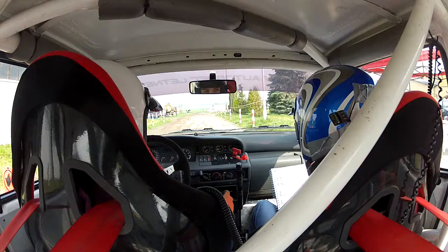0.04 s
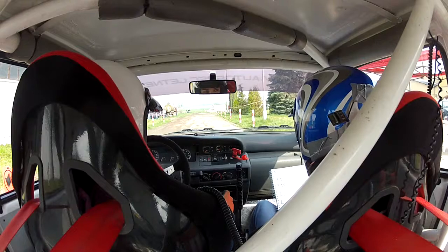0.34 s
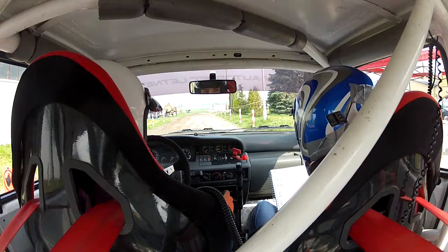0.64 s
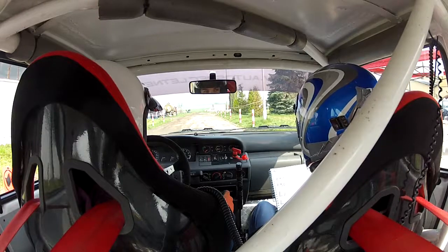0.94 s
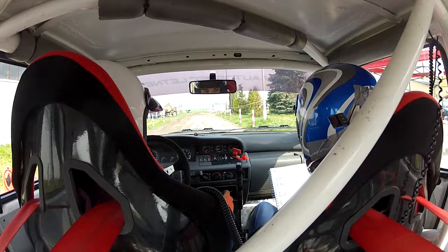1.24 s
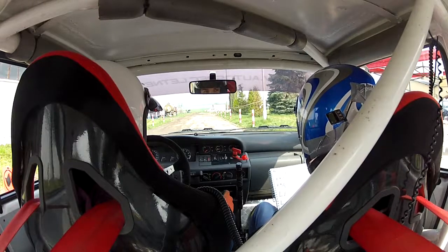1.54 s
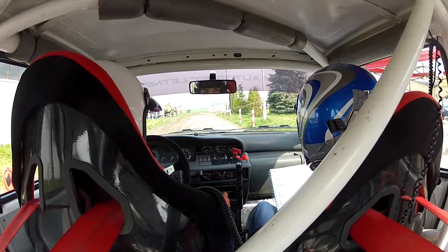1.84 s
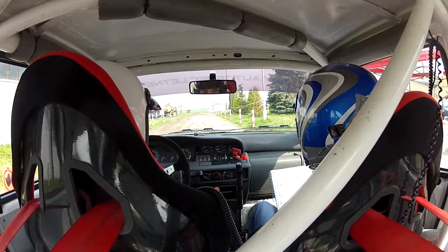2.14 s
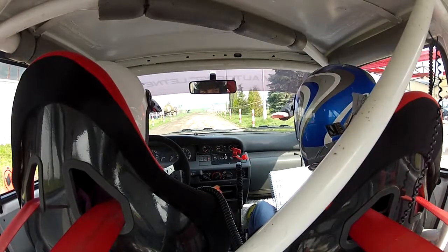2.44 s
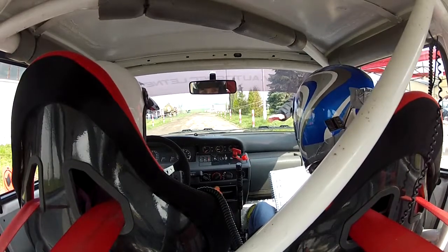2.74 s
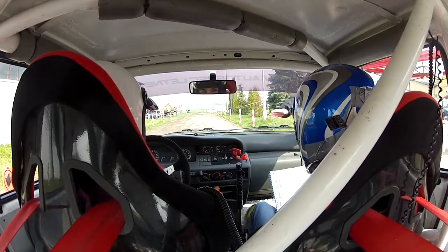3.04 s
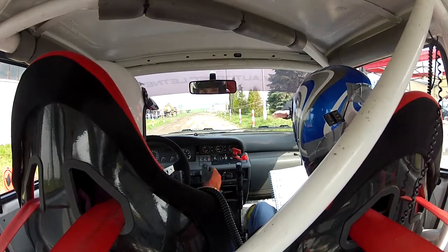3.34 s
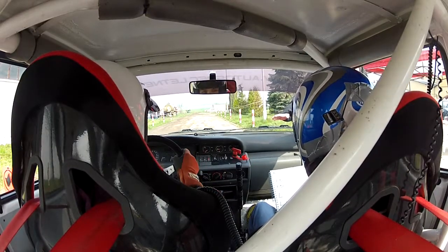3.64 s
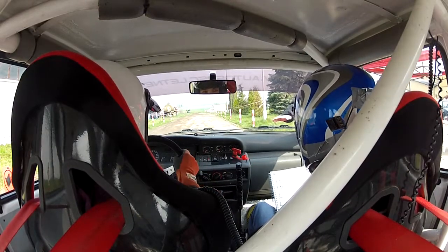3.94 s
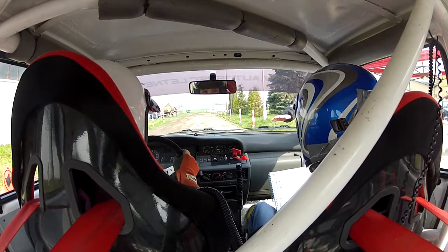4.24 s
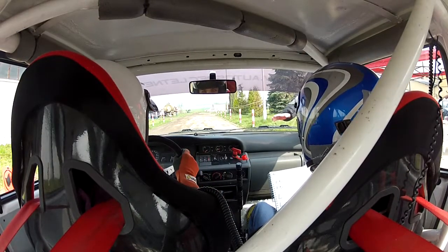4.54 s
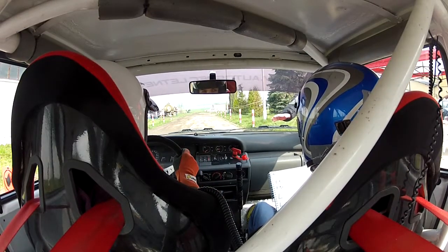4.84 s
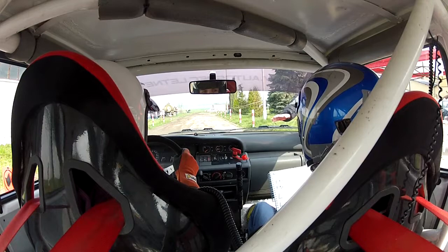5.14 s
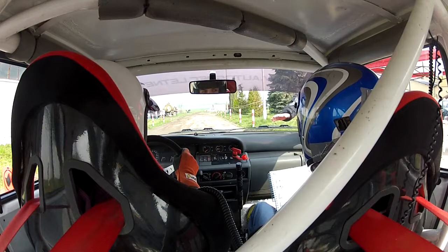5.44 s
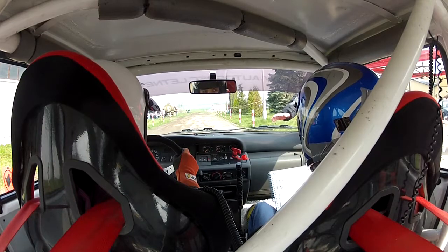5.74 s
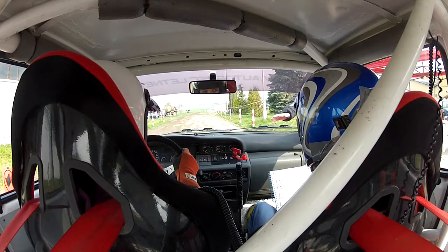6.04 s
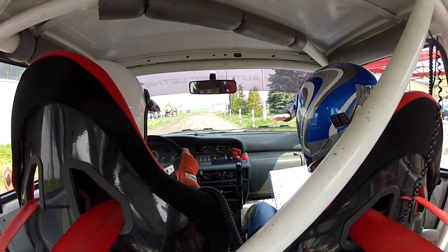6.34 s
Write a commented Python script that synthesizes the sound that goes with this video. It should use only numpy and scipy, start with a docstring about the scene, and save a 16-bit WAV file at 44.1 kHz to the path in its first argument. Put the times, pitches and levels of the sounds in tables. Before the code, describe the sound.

Inside the bare cabin of a standing rally car, two four-cylinder engines boom and beat against each other over valve clatter. One idles steadily. The closer one is blipped, runs down for a couple of seconds, then is blipped five times in quick succession. Loose fittings tick, the bodywork knocks softly, a panel chatters briefly, and one dry click comes near the end. The microphone stays in the cabin.

```python
"""Two four-cylinder engines, heard from one microphone in the bare cabin of a standing rally car.
One idles steadily; the other, close by, is blipped, runs down, then is blipped again and again.
Their exhaust pulses boom in the cabin and beat against each other over the clatter of valve gear.
Loose fittings tick on the crests of the boom, the bodywork knocks softly, a panel chatters
in short spells, and there is one dry click."""
import sys
import numpy as np
from scipy import signal
from scipy.fft import rfft, irfft
from scipy.io import wavfile

SR = 44100
rng = np.random.default_rng(int(sys.argv[2]) if len(sys.argv) > 2 else 0)


def inscribe(sig):
    """Save sig as 16-bit PCM at rate SR to the path in sys.argv[1].

    A 1-D sig is mono; a 2-D sig holds one channel per row.
    Samples are clipped to [-1, 1] before scaling.
    """
    pcm = np.round(np.clip(np.atleast_2d(sig).T, -1, 1) * 32767)
    wavfile.write(sys.argv[1], SR, pcm.astype(np.int16))


N = 291060
TIME = np.arange(N) / SR
IDLE_HZ, REST_HZ = 43.042, 30.026  # firing rates: the steady engine, the blipped one at rest

# metal rung by valve gear and knocks: f/Hz, width/Hz, level/dB, polarity
METAL_MODES = [(534, 7.4, 8, 1), (885, 43, 6.5, 1), (960.5, 18, 9, 1), (1103, 23, 4.5, 1),
               (1556, 17, 0.5, 1), (1772, 29, 3.5, 1)]
# spectrum of valve gear and knocks at the microphone: f/Hz, relative level/dB
CLATTER_SPECTRUM = [(150, -4.5), (330, -1), (430, 3.5), (540, -4), (640, -6), (760, -4), (930, -0.5),
                    (1200, 1), (1450, -7), (1850, -9), (2500, -11.5), (3100, -23), (6000, -30),
                    (15000, -31)]


def gain_of(db):
    """Decibels to amplitude."""
    return 10 ** (np.asarray(db) / 20)


def unit_rms(x):
    """Scales to rms 1."""
    return x / np.sqrt(np.mean(x ** 2) + 1e-20)


def wander(hz):
    """Random drift of rms 1, up to about the given rate."""
    f = np.fft.rfftfreq(N, 1 / SR)
    return unit_rms(irfft(rfft(rng.standard_normal(N)) / (1 + (f / hz) ** 4), N))


def colour(x, spectrum, size=4096):
    """Causal filter of unit energy, shaped by rows of f/Hz, level/dB."""
    hz, db = np.transpose(spectrum)
    f = abs(np.fft.fftfreq(size, 1 / SR))
    log_gain = np.log(gain_of(np.interp(np.log(f + 1), np.log(hz), db)))
    taps = np.fft.ifft(np.exp(np.conj(signal.hilbert(log_gain)))).real  # minimum phase
    return signal.oaconvolve(x, taps / np.linalg.norm(taps))[:N]


def resonances(x, modes):
    """Rings damped modes, given as rows of f/Hz, width/Hz, level/dB, polarity."""
    f = np.fft.rfftfreq(2 * N, 1 / SR)
    response = sum(np.sign(sign) * gain_of(db) * 1j * f * width / (hz ** 2 - f ** 2 + 1j * f * width)
                   for hz, width, db, sign in modes)
    return irfft(rfft(x, 2 * N) * response)[:N]


def below(x, hz):
    """Low-pass without delay."""
    return signal.sosfiltfilt(signal.butter(3, hz, fs=SR, output="sos"), x)


def cycle_starts(cycles):
    """Samples at which a count of cycles passes a whole number."""
    return np.flatnonzero(np.diff(np.floor(cycles)) > 0)


def scrapes(at, sizes, decay_s):
    """A short burst of noise at each contact."""
    contacts = np.zeros(N)
    contacts[at] = sizes
    pole = np.exp(-1 / (decay_s * SR))
    envelope = signal.lfilter([np.sqrt(1 - pole * pole)], [1, -pole], contacts)
    return envelope * rng.standard_normal(N)


def idling_engine(cycles, note_db=-19.0, waver=0.55):
    """The steady exhaust: a firm firing note and overtones that waver from cycle to cycle."""
    # exhaust overtones: multiple of the firing rate, level/dB
    orders = [(2, -33), (2.5, -37.5), (3, -38), (4, -47.5), (5, -46.5), (6, -39.5), (7, -57), (8, -66.5)]
    overtones = np.zeros(N)
    for order, db in orders:
        wavering = 1 + waver * (wander(11.5) + 1j * wander(13.6))  # in level and phase
        overtones += gain_of(db) * (wavering * np.exp(2j * np.pi * order * cycles)).real
    return gain_of(note_db) * np.cos(2 * np.pi * cycles) + overtones


def throttle(drop_s=.06, coast_s=.983, lead_s=0.033, pedal_s=0.014):
    """Blips raise the revs; one light touch near 2 s only swells the boom as the engine runs down."""
    # blips and the touch: start t/s, end t/s, firing rate at the end/Hz, share that drops fast, load/dB
    presses = [(1.15, 1.502, 66, 0.086, 4.5), (1.903, 2.05, 49.55, 0.0044, 4.5),
               (4.078, 4.498, 64.2, 0.27, 3), (4.69, 4.929, 62, .22, 4), (5.2, 5.498, 64.5, .1, 4.5),
               (5.829, 6.091, 67.5, .15, 4.5), (6.428, 6.69, 64, .18, 3.5)]
    rate, push_db, coasted_s = np.full(N, REST_HZ), np.zeros(N), np.zeros(N)
    for start, end, end_hz, drop, load_db in presses:
        progress = np.clip((TIME - start) / (end - start), 0, 1)
        blend = np.sin(np.pi / 2 * progress) ** 1.571  # S-curve
        since = np.maximum(TIME - end, 0)
        left = drop * np.exp(-since / drop_s) + (1 - drop) * np.exp(-since / coast_s)
        rate = rate + blend * (REST_HZ + (end_hz - REST_HZ) * left - rate)
        # the throttle moves a little ahead of the speed and takes a moment to open or shut
        opened, shut = (.5 + .5 * np.tanh((TIME + lead_s - s) / pedal_s) for s in (start, end))
        push_db += load_db * (opened - shut)
        coasted_s = coasted_s * (1 - opened) + since
    # with the throttle shut it fires harder at speed, softer the longer it coasts
    shut_db = -5 + 8 * np.log2(rate / REST_HZ) - 3 * coasted_s
    return rate, shut_db + push_db


def blipped_engine(rate, load_db, uneven=0.23, cylinders=(1.12, .92, 1.05, .9)):
    """Close by: one exhaust pulse a firing, no two alike, and a turbulent rush that grows with speed."""
    # boom of exhaust and cabin: f/Hz, width/Hz, level/dB, polarity at the microphone
    cabin_modes = [(43.06, 2.32, -7, 1), (60.7, 7.7, -39, -1), (90.4, 6.4, -30.5, 1), (107.9, 13, -24.5, 1),
                   (122.6, 7.8, -17.5, -1), (167.5, 2.5, -31.5, 1), (202.7, 10.5, -38.5, -1),
                   (221.3, 8.2, -34, 1), (256.3, 7.66, -28, -1), (294, 26, -49.5, 1), (338, 54, -50, -1)]
    at = cycle_starts(np.cumsum(rate) / SR)
    strength = np.resize(cylinders, len(at)) * (1 + uneven * rng.standard_normal(N)[:len(at)])
    pulses = np.zeros(N)
    pulses[at] = strength * SR / (2 * rate[at])
    rush_db = 7.5 + 8 * np.log2(rate / rate.max())
    exhaust = pulses + gain_of(rush_db) * rng.standard_normal(N)
    # load hardens the pulses: the overtones grow more than the firing note
    bass = below(exhaust, hz=69.6)
    exhaust = bass * gain_of(0.22 * load_db) + (exhaust - bass) * gain_of(load_db)
    return resonances(below(exhaust, hz=423), cabin_modes)


def valve_clatter(idle_cycles, blipped_rate, trim_db=2.5, per_octave_db=4.5, throb=0.053, grain=0.26):
    """Valve gear rings the metal: two taps an idle firing in grainy noise, louder as the revs rise."""
    # clatter at resting speed: t/s, relative level/dB
    rest_levels = [(0, -51.5), (2.0, -51.5), (2.4, -53.5), (6.6, -53.5)]
    throbbing = 1 + throb * np.cos(2 * np.pi * idle_cycles)
    drive = rng.standard_normal(N) * throbbing * np.exp(grain * wander(170))
    taps = cycle_starts(2 * idle_cycles)
    drive[taps] += gain_of(20) * rng.random(N)[:len(taps)]
    drive += resonances(drive, METAL_MODES)
    rest_db = np.interp(TIME, *np.transpose(rest_levels))
    revs_db = per_octave_db * np.log2(blipped_rate / REST_HZ)
    return unit_rms(colour(drive, CLATTER_SPECTRUM)) * gain_of(rest_db + revs_db + trim_db)


def loose_fittings(boom, trim_db=1.0, crest_db=-17.5, follow=0.52, scatter_db=1.0, cluster_db=6.0):
    """In spells, fittings touch on the crests of the low boom, in uneven clusters, harder on high ones."""
    # spells of ticking: start t/s, end t/s, relative level/dB
    spells = [(.1, .43, -70.5), (0.446, 0.816, -66.5), (1.29, 1.389, -66), (1.62, 1.881, -72.5),
              (1.89, 2.08, -63.5), (2.18, 2.949, -64.5), (3.4, 3.961, -67.5), (4.22, 4.42, -62),
              (4.43, 5.68, -64), (5.82, 6.6, -67)]
    # spectrum of a tick: f/Hz, relative level/dB
    tick_spectrum = [(800, -22), (2400, -0.5), (3500, 3.5), (4300, -3.5), (5000, -3), (5450, 7.5),
                     (6000, -16.5), (6550, 4.5), (7200, -8.5), (8600, -8), (10000, -10), (15000, -28)]
    low = below(boom, hz=59.8)
    crests = signal.find_peaks(low, height=0, distance=SR // 60)[0]
    loose = sum(gain_of(db) * (start < TIME[crests]) * (TIME[crests] < end) for start, end, db in spells)
    chance_db = scatter_db * rng.standard_normal(N)[:len(crests)]
    chance_db += cluster_db * np.minimum(wander(10)[crests], 1)
    sizes = loose * (low[crests] / gain_of(crest_db)) ** follow * gain_of(trim_db + chance_db)
    ticks = scrapes(crests, sizes * np.sqrt(2 * N / len(crests)), decay_s=0.0027)
    return colour(ticks, tick_spectrum)


def body_knocks(trim_db=-5., decay_s=0.006, ring_db=38.):
    """Dull taps in the bodywork ring the same metal as the valve gear."""
    # soft knocks: t/s, relative level/dB
    knocks = [(1.247, -36.5), (1.443, -42), (1.51, -41.5), (1.814, -45), (2.044, -40), (3.205, -38),
              (3.556, -41), (3.612, -46), (3.764, -39), (3.859, -43)]
    times, db = np.transpose(knocks)
    at, blows = (times * SR).astype(int), np.zeros(N)
    blows[at] = gain_of(db + trim_db)
    taps = scrapes(at, blows[at] * np.sqrt(decay_s * SR / 2), decay_s)
    ring = gain_of(ring_db) * resonances(blows, METAL_MODES)
    return colour(taps + ring, CLATTER_SPECTRUM) / 2


def panel_chatter(rate, decay_s=0.0032, trim_db=1.0, vary=0.23):
    """In spells, a panel knocks once a joint swing of the two engines, each crunch much like the last."""
    # spells of chatter: first knock t/s, end t/s, relative level/dB
    spells = [(2.494, 2.72, -9), (4.282, 4.315, -9.5), (4.326, 4.34, -19.5), (4.585, 4.6, -16.5)]
    # spectrum of the panel: f/Hz, relative level/dB
    panel_spectrum = [(400, -26.5), (700, -11), (950, 1.5), (1200, 5), (1500, -0.5), (1850, 2),
                      (2200, -5.5), (2600, -8.5), (3000, -12.5), (3800, -13.5), (4500, -18), (8000, -24),
                      (15000, -22)]
    swings = np.cumsum(rate + IDLE_HZ) / (2 * SR)  # at the mean of the two firing rates
    blows = np.zeros(N)
    for start, end, db in spells:
        first = int(start * SR)
        repeats = cycle_starts(swings[first:int(end * SR)] - swings[first])
        blows[first + np.append(0, repeats)] = gain_of(db)
    crunch = rng.standard_normal(1024) * np.exp(-TIME[:1024] / decay_s)
    crunch = irfft(np.exp(1j * np.angle(rfft(crunch))))  # even in colour, spread in time
    at = np.flatnonzero(blows)
    contact = signal.oaconvolve(blows, crunch[:len(crunch) // 2])[:N]
    contact += vary * scrapes(at, blows[at], decay_s)
    return gain_of(trim_db) * colour(contact, panel_spectrum)


def click():
    """A single dry snap: a step in pressure that dies at once."""
    # the snap: t/s, level/dB, decay/s
    snap = (5.6785, -11, .0004)
    start, db, decay_s = snap
    return -gain_of(db) * (TIME >= start) * np.exp(-abs(TIME - start) / decay_s)


def scene(drift_cycles=.025):
    """Both engines and everything they shake, summed at the microphone in the cabin."""
    idle_cycles = IDLE_HZ * TIME + drift_cycles * wander(1.5)
    rate, load_db = throttle()
    boom = idling_engine(idle_cycles) + blipped_engine(rate, load_db)
    clatter = valve_clatter(idle_cycles, rate)
    rattles = loose_fittings(boom) + panel_chatter(rate) + body_knocks() + click()
    return (boom + clatter + rattles)[None]


def record(dry, jitter_samples=1.3, jitter_hz=12000, opens_s=0.095, rise_s=0.017, edge_hz=15600):
    """An uneven sample clock mirrors the sound faintly into the treble; it fades in, band-limited."""
    timing_error = jitter_samples * np.cos(2 * np.pi * jitter_hz * TIME)
    slope = signal.sosfilt(signal.butter(2, 4500, fs=SR, output="sos"), np.gradient(dry, axis=1))
    fade = gain_of(-64) + np.clip((TIME - opens_s) / rise_s, 0, 1)
    heard = (dry + slope * timing_error) * fade
    band_limit = signal.firwin(511, edge_hz, window=("kaiser", 9), fs=SR)
    return signal.oaconvolve(heard, band_limit[None], "same")


dry = scene()
out = record(dry)
inscribe(out)
```